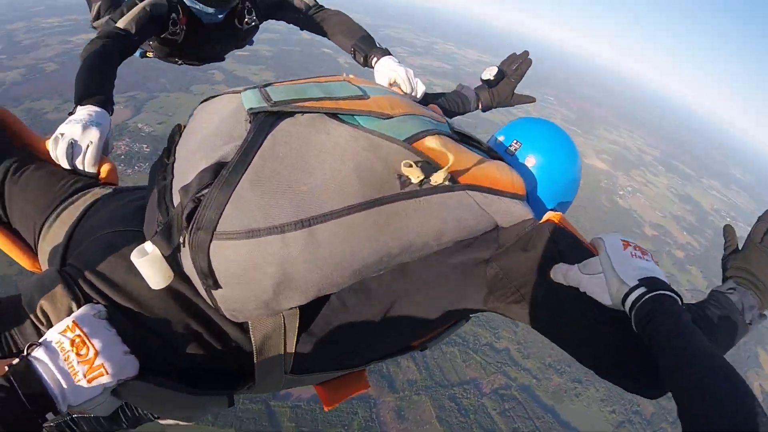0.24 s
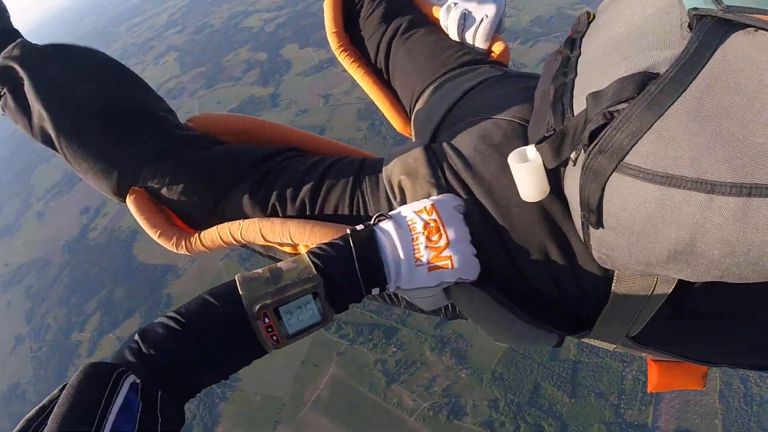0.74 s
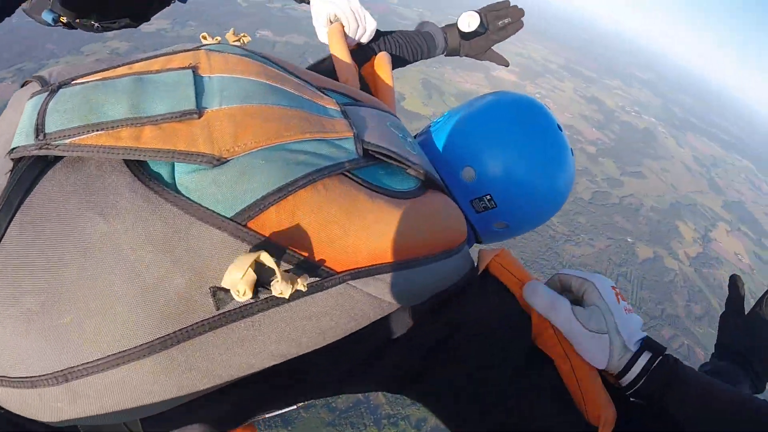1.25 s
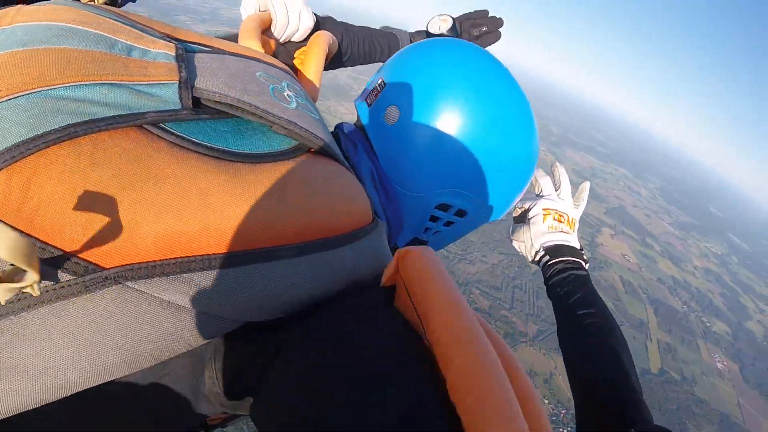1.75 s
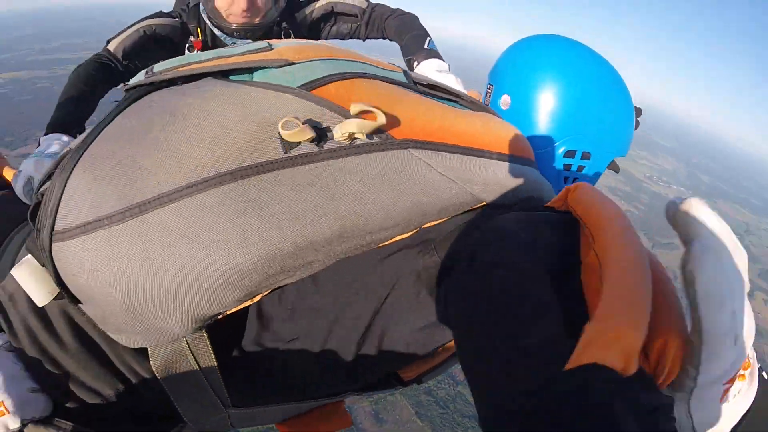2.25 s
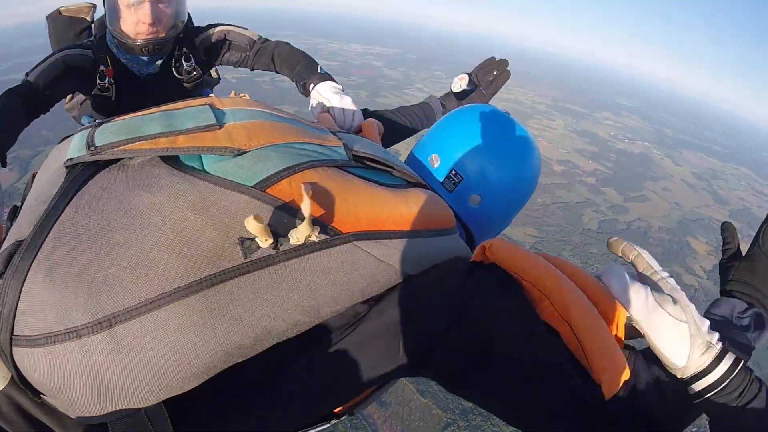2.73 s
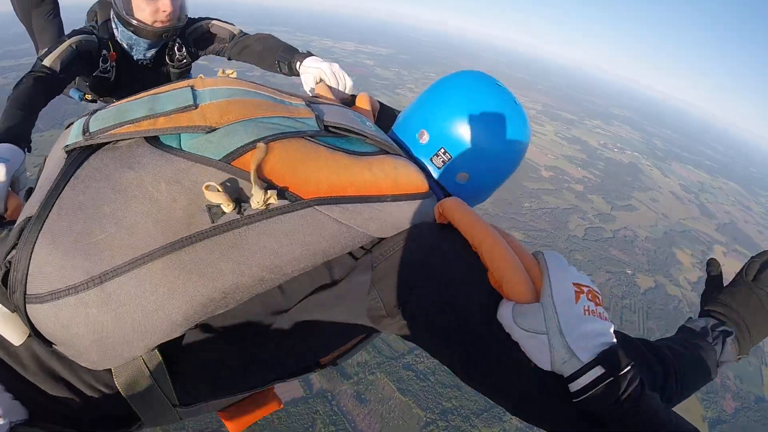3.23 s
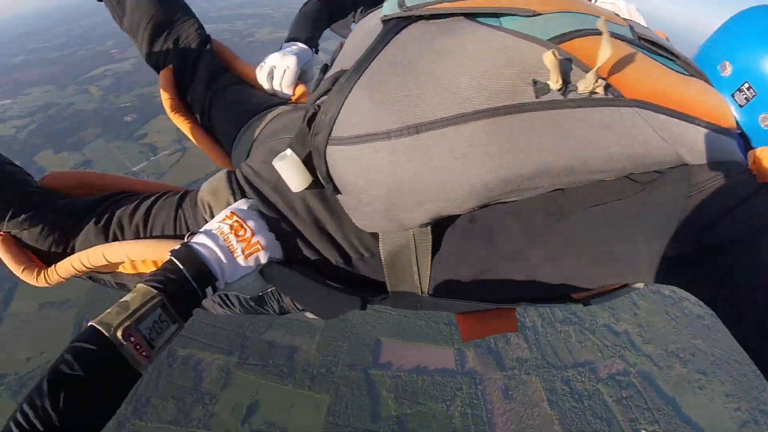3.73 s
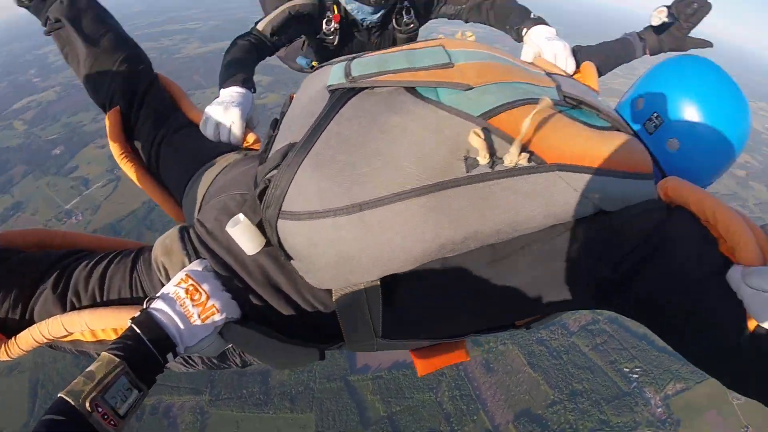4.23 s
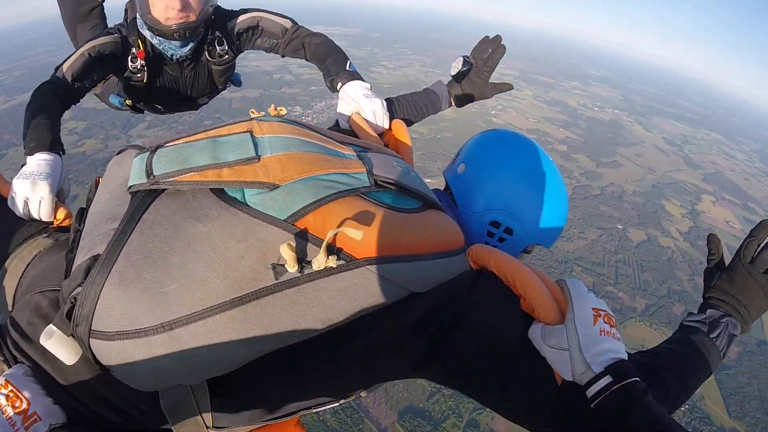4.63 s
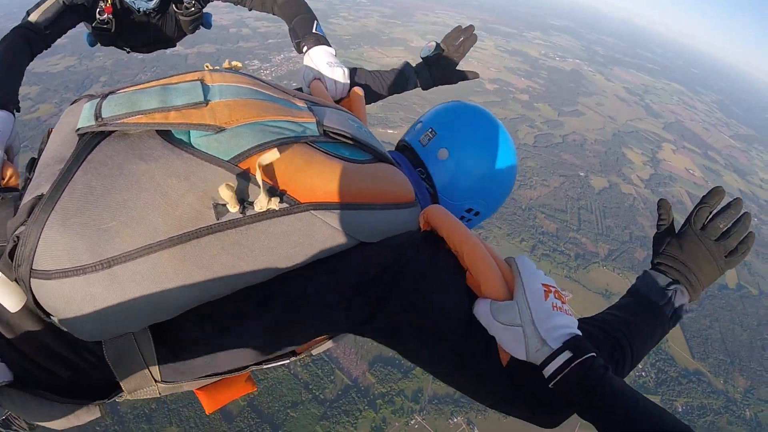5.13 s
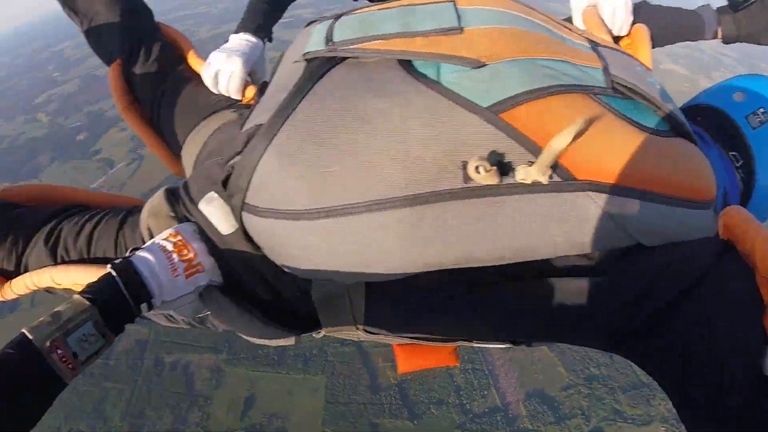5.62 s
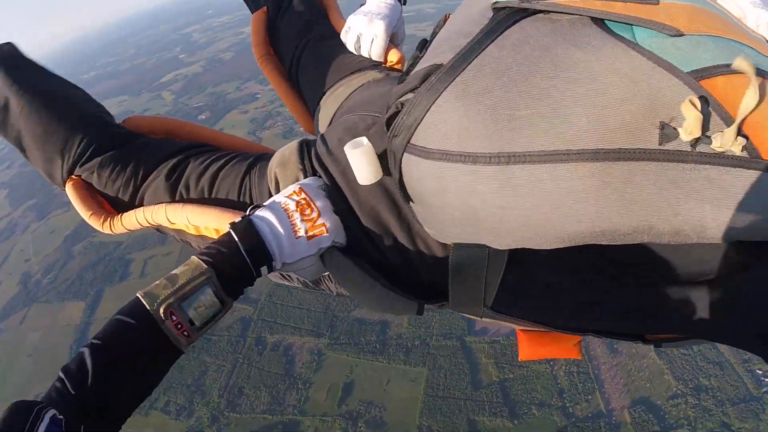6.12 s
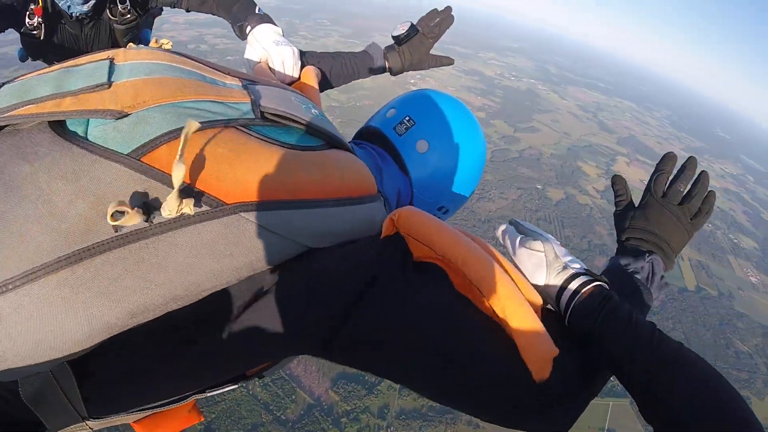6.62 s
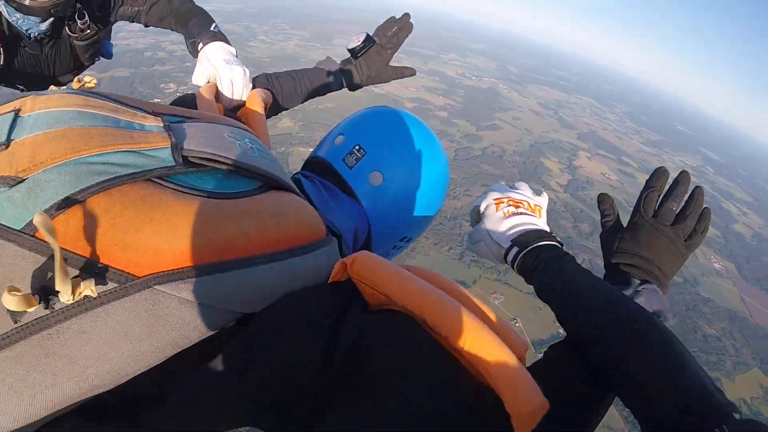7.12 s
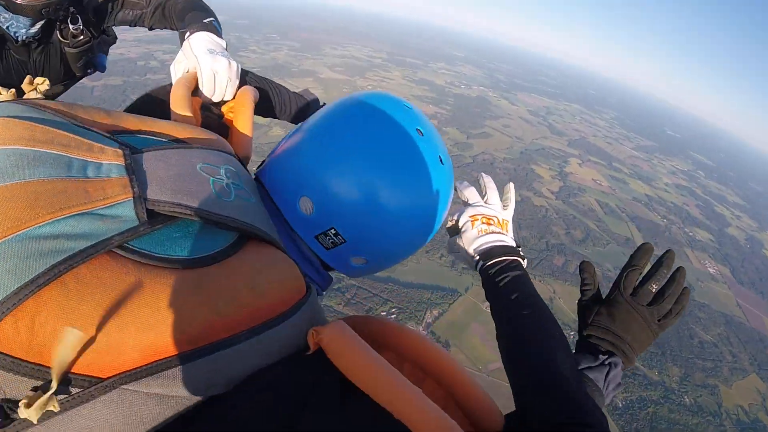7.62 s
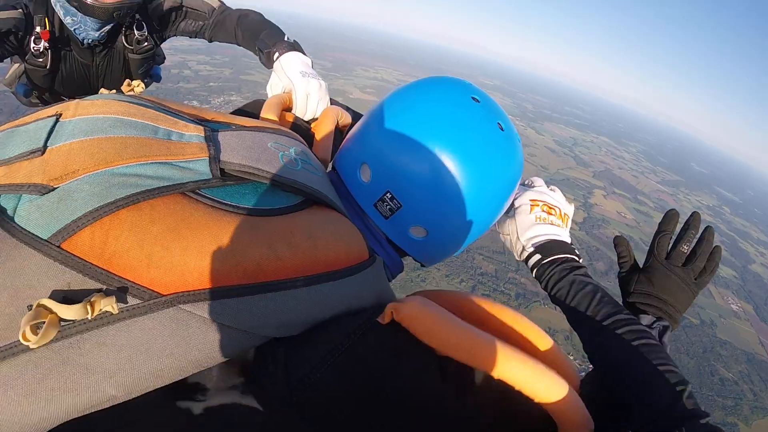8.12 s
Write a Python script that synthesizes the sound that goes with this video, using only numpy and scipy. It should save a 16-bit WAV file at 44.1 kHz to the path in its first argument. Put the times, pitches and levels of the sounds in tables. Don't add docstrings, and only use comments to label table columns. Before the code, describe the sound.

Heavy low wind buffeting batters a skydiver's camera microphone, mixed with a rushing roar, crackling snaps, thuds and shifting airy hiss.

```python
import sys
import numpy as np
from scipy import signal
from scipy.fft import rfft, irfft, next_fast_len
from scipy.io import wavfile
from scipy.ndimage import uniform_filter1d, map_coordinates

SR = 44100
rng = np.random.default_rng(int(sys.argv[2]) if len(sys.argv) > 2 else 0)


def invert_db(level):
    return 10 ** (np.asarray(level, dtype=float) / 20)


def inscribe(sig):
    pcm = np.round(np.clip(np.atleast_2d(sig).T, -1, 1) * 32767)
    wavfile.write(sys.argv[1], SR, pcm.astype(np.int16))


N = 368676

# frequency in Hz, density in dB per Hz.
PREAMP_SPECTRUM = [(2000, -33.5), (8000, -1.5), (13000, -2), (15700, -17), (17000, -120)]
# frequency in Hz, density in dB per Hz.
TRAIL_SPECTRUM = [(400, -50), (800, -6), (1200, 1), (1600, -4.5), (2200, -14), (3500, -36.5), (8000, -120)]
# frequency in Hz, density in dB per Hz.
HISS_SPECTRUM = [(700, -25), (1700, 0.5), (2900, -4.5), (3900, -12), (4750, -19.5), (5600, -12.5),
                 (6600, -8), (7500, -11.5), (8600, -20), (11000, -31.5), (13500, -48.5), (15700, -69),
                 (17000, -120)]
# frequency in Hz, density in dB per Hz.
SNAP_SPECTRUM = [(700, -61), (2000, 5.5), (4750, -11), (6600, 2.5), (8600, -10.5), (11000, -28),
                 (14000, -38), (17000, -120)]
# frequency in Hz, density in dB per Hz.
RUSH_SPECTRUM = [(200, -53.5), (450, 1), (900, -4.5), (1700, -14.5), (2800, -39.5), (4500, -39),
                 (8000, -120)]
# frequency in Hz, density in dB per Hz.
ROAR_SPECTRUM = [(90, -63), (170, -4.5), (270, 0), (380, -3.5), (520, -13.5), (800, -25), (1600, -120)]
# frequency in Hz, density in dB per Hz.
GROWL_SPECTRUM = [(60, -67.5), (130, -3), (190, -1), (270, -7.5), (400, -22), (900, -120)]
# frequency in Hz, density in dB per Hz.
LOOSE_SPECTRUM = [(10, -30), (20, -2), (38, 0), (60, -7), (90, -9), (125, -6), (155, -16), (220, -40),
                  (400, -120)]
# frequency in Hz, density in dB per Hz.
SHED_SPECTRUM = [(20, -36.5), (45, -8), (65, 2), (85, -6.5), (120, -12.5), (150, -35), (400, -120)]
# time in seconds, flow across the port in dB, helmet wake in dB,
# flow parting at the rim in dB.
HEAD = [(0, -33.5, -15, -26), (.32, -40, -20.5, -25.5), (.49, -29.5, -15, -28.5), (1.1, -33.5, -19, -25),
        (2.05, -47.5, -18, -30.5), (2.6, -49, -29, -37.5), (3.45, -47, -26, -33.5),
        (3.7, -37.5, -22.5, -33.5), (4.3, -37, -13, -30), (4.37, -48.5, -11.5, -31.5),
        (4.85, -42, -24.5, -28), (5.45, -44.5, -25.5, -31.5), (5.7, -38, -21.5, -32),
        (6.4, -35.5, -16.5, -27), (6.7, -47, -28, -31), (7.6, -52.5, -24, -40), (7.9, -43.5, -18.5, -31.5),
        (8.36, -48, -25.5, -34)]
# time in seconds, change in dB, half length in seconds.
PUFFS = [(0.11, -12, 0.0072), (0.16, 7, 0.0077), (0.59, -5.5, 0.014), (0.98, 4, 0.0092), (1.27, -4.5, 0.11),
         (1.51, -4.5, 0.051), (1.89, 4.0, 0.016), (2.15, 4, 0.038), (2.24, 10.5, 0.07), (2.32, 7.5, 0.015),
         (2.57, -3, 0.036), (2.65, -4, 0.011), (2.71, 9.5, 0.015), (2.82, -7.5, 0.025), (2.96, 4, 0.018),
         (3.11, -6, 0.019), (3.2, -12, 0.0081), (3.53, 5, 0.015), (3.58, 8.5, 0.0058), (3.63, -7, 0.015),
         (4.5, 4, 0.0079), (4.55, 6, 0.0062), (6.46, -4.0, 0.028), (6.6, 6.5, 0.035), (6.87, 3, 0.0098),
         (7.18, 7, 0.015), (7.28, 8.5, 0.013), (7.82, 6, 0.0049), (8.06, 4, 0.0074), (8.17, 4.5, 0.012)]
# time in seconds, depth in dB.
GAPS = [(.93, 4.5), (1.171, 10), (1.77, 1), (1.84, 1), (2.21, 6), (2.455, 4), (3.005, 2.5), (3.3, 6),
        (3.47, 5), (4.39, 4), (4.47, 2.5), (4.535, 8), (4.585, 10.5), (4.627, 10.5), (4.757, 4), (5.35, 3),
        (6.8, 9.5), (7.02, 6.5), (7.09, 0), (7.24, 0.5), (7.32, 7), (7.512, 7.5), (7.8, 5), (8.13, 2.5),
        (8.2, 6)]
# time in seconds, change in dB, half length in seconds.
SURGES = [(0.35, -2, 0.015), (0.59, 5.5, 0.0078), (0.78, 3, 0.063), (0.92, 3.5, 0.015), (1.34, 3.9, 0.018),
          (1.49, -5, 0.074), (1.8, -10, 0.04), (1.95, 3.7, 0.051), (2.16, 2.5, 0.017), (2.36, 4.5, 0.073),
          (2.7, 10, 0.023), (2.97, 3, 0.02), (3.13, 0, 0.05), (3.33, 11, 0.013), (3.5, 0.5, 0.015),
          (3.57, 6.5, 0.036), (4.56, -5.5, 0.057), (4.87, 7, 0.046), (5.15, -2.6, 0.025),
          (5.48, 6.5, 0.023), (6.08, 2.5, 0.07), (6.33, -3.5, 0.028), (6.88, 0.5, 0.029),
          (7.08, -0.5, 0.047), (7.41, -3, 0.015), (7.56, -8.5, 0.026)]
# time in seconds, share of the smaller ones from 0 to 1.
SMALL_SHARE = [(0, 0.94), (.25, .5), (.7, 0.27), (1.0, 0.72), (1.35, 0.52), (1.6, 0.58), (2.0, 0.37),
               (2.7, 0.18), (3.4, 0.66), (4.1, 0.11), (4.4, 0.48), (5.0, 0.77), (5.7, 0.33), (6.15, 0.06),
               (6.35, 0.81), (7.1, 0.63), (7.8, 0.34), (8.36, 0.22)]
# time in seconds, peak in dB, low thump in dB above the peak.
SLAPS = [(0.0653, -33, 17), (0.15, -22, 6), (0.255, -19.5, 10), (0.5405, -13, -6), (0.6725, -11, -2),
         (0.8012, -11, 6), (0.9599, -12, -7), (1.0725, -14, -5), (1.149, -15, 0), (2.1073, -23, 21),
         (2.2396, -19.5, 19.5), (2.9377, -28, 23.5), (3.269, -25, 21.5), (3.5827, -28, 19),
         (3.657, -26, 10), (3.9165, -20, -2), (3.9545, -15.5, -11), (4.1124, -17.5, -2), (4.602, -25.5, 25),
         (5.022, -22.5, 23), (5.189, -25, 8), (5.2915, -24.5, 3), (5.9625, -18, -9), (5.9913, -18.5, -6),
         (6.0626, -14.5, -10.5), (6.127, -14.5, -1), (6.239, -17.5, 0), (6.5786, -18, -9), (7.8184, -31, 4),
         (8.0515, -19.5, 17)]
# time in seconds, peak in dB, pitch in Hz.
KNOCKS = [(1.126, -16, 315), (1.73, -17, 355), (1.776, -11.5, 678), (1.929, -14, 385), (2.245, -8, 300),
          (2.353, -9.5, 446), (2.625, -20.5, 353), (2.839, -23, 323), (2.987, -14, 333), (3.154, -18, 374),
          (3.225, -11.5, 361), (3.328, -9, 415), (3.49, -10.5, 320), (3.506, -9, 455), (4.384, -16, 312),
          (4.513, -10, 490), (4.633, -25, 407), (4.655, -12, 393), (4.957, -9.5, 328), (5.291, -11.5, 398),
          (6.254, -10, 320), (6.963, -14.5, 498), (7.376, -16.5, 315), (7.531, -21.5, 301),
          (7.584, -27, 400), (7.814, -14.5, 297), (7.917, -11.5, 540), (8.011, -8, 445), (8.051, -9, 316),
          (8.22, -16.5, 506)]
# time in seconds, change in dB, half length in seconds.
LULLS = [(0.24, -3, 0.14), (0.54, -4.8, 0.037), (0.79, -2.5, 0.024), (2.59, -7, 0.021), (3.08, -7, 0.02),
         (3.88, -4.4, 0.073), (4.17, -1.2, 0.1), (5.89, -2.5, 0.03), (6.06, -3.5, 0.07), (6.66, -9, 0.028),
         (7.33, -3, 0.018), (7.64, -2.2, 0.15), (8.11, -7.5, 0.027), (8.36, -1, 0.1)]
# time in seconds, regular share from 0 to 1.
LOCKING = [(0, .5), (.5, 0.12), (1.2, 0.15), (1.65, .9), (2.15, 0.25), (2.75, 0.64), (3.4, 0.7), (3.9, 0.2),
           (4.5, 0.56), (5.1, .3), (5.9, .3), (6.3, .4), (6.8, 0.78), (7.4, 0.74), (8.0, 0.34), (8.36, 0.6)]


def unit(x):
    return x / np.sqrt(np.mean(x ** 2) + 1e-20)


def curves(rows):
    time_s, *columns = np.transpose(rows)
    return [np.interp(np.arange(N) / SR, time_s, column) for column in columns]


def bells(rows):
    t = np.arange(0, N + 64, 64) / SR
    total_db = sum(db * np.exp(-0.5 * ((t - s) / half_s) ** 2) for s, db, half_s in rows)
    return np.interp(np.arange(N) / SR, t, total_db)


def wobble(rate_hz):
    knots = rng.standard_normal(int(N * 400 / SR) + 4)
    return map_coordinates(knots, [np.arange(N) * min(rate_hz, 400) / SR])


def coloured(x, spectrum):
    size = next_fast_len(N + 8192)
    hz, db = np.transpose(spectrum)
    log_hz = np.log(np.fft.rfftfreq(size, 1 / SR) + 1)
    gain = invert_db(np.interp(log_hz, np.log(hz + 1), db))
    return unit(irfft(rfft(x, size) * gain, size)[:N])


def eddies(spectrum, swell_db):
    return coloured(invert_db(swell_db) * rng.standard_normal(N), spectrum)


def evened(x, span_s, depth):
    power = uniform_filter1d(x ** 2, size=int(span_s * SR) + 1)
    envelope = np.sqrt(np.abs(power) + 1e-8)
    return unit(x * envelope ** -depth)


def preamp_hiss():
    return invert_db(-83) * coloured(rng.standard_normal(N), PREAMP_SPECTRUM)


def trail(port_db, flutter, spit):
    lag_s, level_db = 0.09, -1
    late_db = np.interp(np.arange(N) - lag_s * SR, np.arange(N), port_db)
    swell_db = 1.1 * flutter + 1.1 * spit + 0.9 * wobble(60)
    return invert_db(np.maximum(port_db, late_db) + level_db) * eddies(TRAIL_SPECTRUM, swell_db)


def hiss(hiss_db, flutter, spit):
    fizz = wobble(300)
    swell_db = 0.69 * flutter + 1.2 * spit + 1.2 * wobble(70) + 2.1 * fizz + 0.95 * wobble(60)
    steady = eddies(HISS_SPECTRUM, swell_db)
    snaps = eddies(SNAP_SPECTRUM, 4.6 * wobble(390) + 1.5 * spit)
    return invert_db(hiss_db + 2.5) * (steady + invert_db(-9.5) * snaps)


def rush(rush_db, flutter, spit):
    swell_db = 1.0 * flutter + 1.2 * spit + 1.43 * wobble(60)
    return invert_db(rush_db + 1.0) * eddies(RUSH_SPECTRUM, swell_db)


def roar(roar_db, flutter):
    small = np.clip(curves(SMALL_SHARE)[0] + 0.1 * wobble(6), 0, 1)
    swell_db = 1.3 * flutter + 1.45 * wobble(45)
    smaller = np.sqrt(small) * eddies(ROAR_SPECTRUM, swell_db)
    larger = np.sqrt(1 - small) * eddies(GROWL_SPECTRUM, swell_db)
    return invert_db(roar_db - 0.4) * (smaller + larger)


def wind():
    port_db, wake_db, rim_db = curves(HEAD)
    gap_half_s = 0.0057
    puffs_db = bells(PUFFS) - bells([(s, db, gap_half_s) for s, db in GAPS])
    surges_db = bells(SURGES)
    hiss_db = port_db + puffs_db
    shelter = np.clip(1 - 0.11 * (uniform_filter1d(hiss_db, size=SR // 4) + 43.5), 0.3, 2)
    rush_db = rim_db + 0.71 * shelter * puffs_db + 0.25 * surges_db
    flutter, spit = shelter * wobble(40), shelter * wobble(110)
    fine = trail(port_db, flutter, spit) + hiss(hiss_db, flutter, spit)
    return fine + rush(rush_db, flutter, spit) + roar(wake_db + surges_db, flutter)


def bursts(times_s, levels_db, t60_s, rise_s, spectrum):
    t = np.arange(SR // 20) / SR
    shape = np.zeros(N + SR)
    for s, db in zip(times_s, levels_db):
        shape[round(s * SR):][:len(t)] += invert_db(db - 60 * t / t60_s) * (1 - np.exp(-t / rise_s))
    return shape[:N] * coloured(rng.standard_normal(N), spectrum)


def slaps():
    s, peak_db, thump_db = np.transpose(SLAPS)
    snap = bursts(s, peak_db - 2.0, 0.013, 0.00083, SNAP_SPECTRUM)
    return snap + bursts(s, peak_db + thump_db - 10.5, 0.022, 0.0013, RUSH_SPECTRUM)


def knocks():
    t = np.arange(SR // 20) / SR
    jolts = np.zeros(N + SR)
    phases = rng.uniform(0, 2 * np.pi, len(KNOCKS))
    for (s, db, hz), phase in zip(KNOCKS, phases):
        body = invert_db(db + 6.5 - 60 * t * hz / 7) * (1 - np.exp(-t * hz / 0.5))
        jolts[round(s * SR):][:len(t)] += body * np.sin(2 * np.pi * hz * t + phase)
    knock_s, knock_db, _ = np.transpose(KNOCKS)
    return jolts[:N] + bursts(knock_s, knock_db - 4.5, 0.025, 0.001, RUSH_SPECTRUM)


def buffet():
    share = np.clip(curves(LOCKING)[0], 0, 1)
    loose = eddies(LOOSE_SPECTRUM, 0.32 * wobble(18))
    regular = eddies(SHED_SPECTRUM, 0.32 * wobble(5.6))
    heave = np.sqrt(1 - share) * loose + np.sqrt(share) * regular
    return invert_db(-10.5 + bells(LULLS)) * evened(heave, span_s=0.028, depth=0.43)


def scene():
    return (wind() + slaps() + knocks() + buffet())[None]


def low_pass(x):
    return signal.sosfilt(signal.butter(12, 15700, fs=SR, output="sos"), x)


def record(dry):
    held = dry / (1 + np.abs(dry / 1.05) ** 4) ** (1 / 4)
    return low_pass(held + preamp_hiss())


dry = scene()
out = record(dry)
inscribe(out)
```